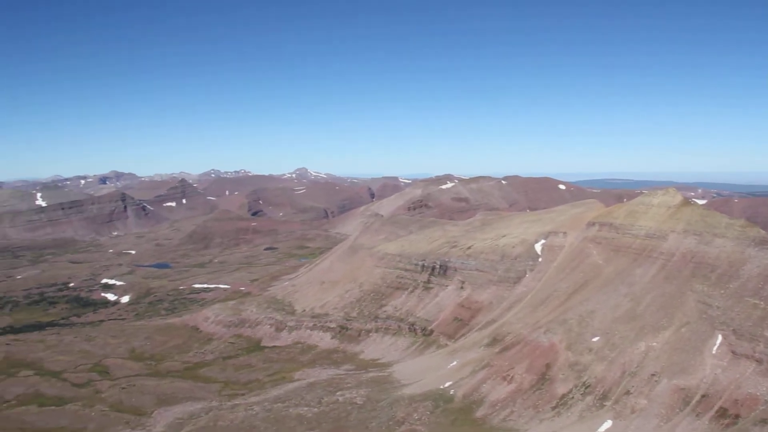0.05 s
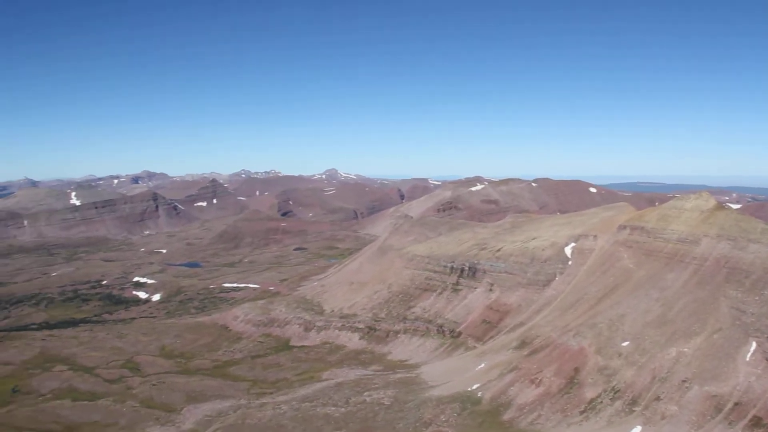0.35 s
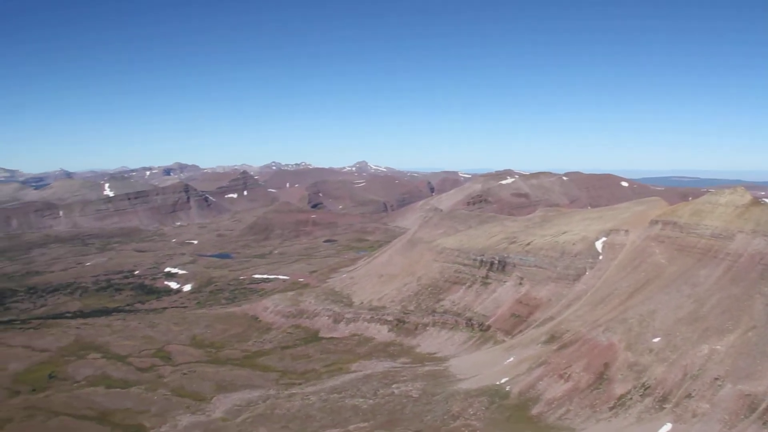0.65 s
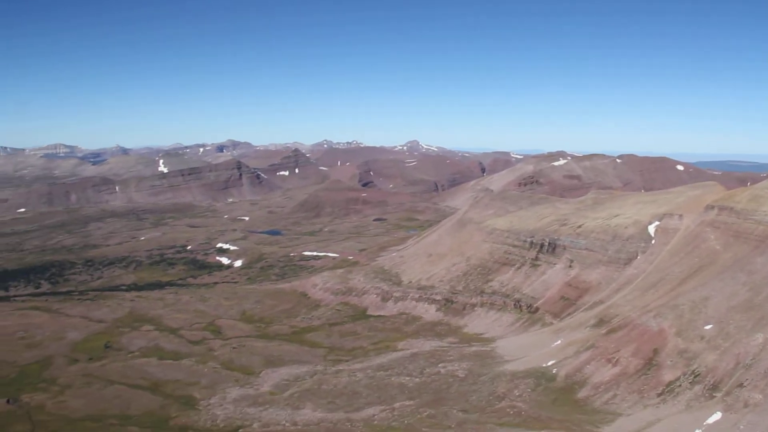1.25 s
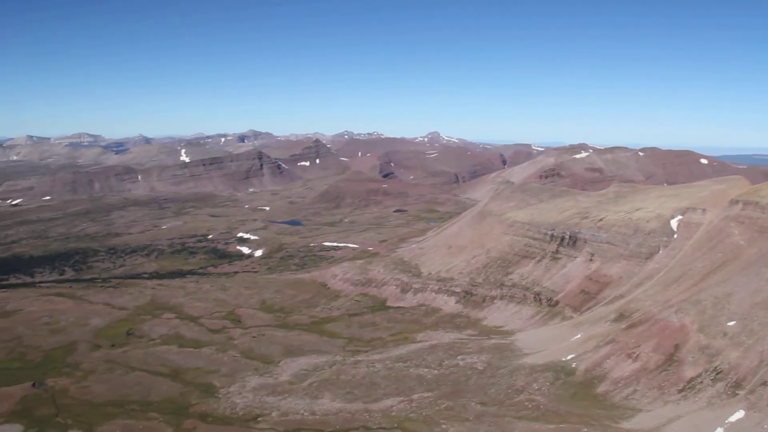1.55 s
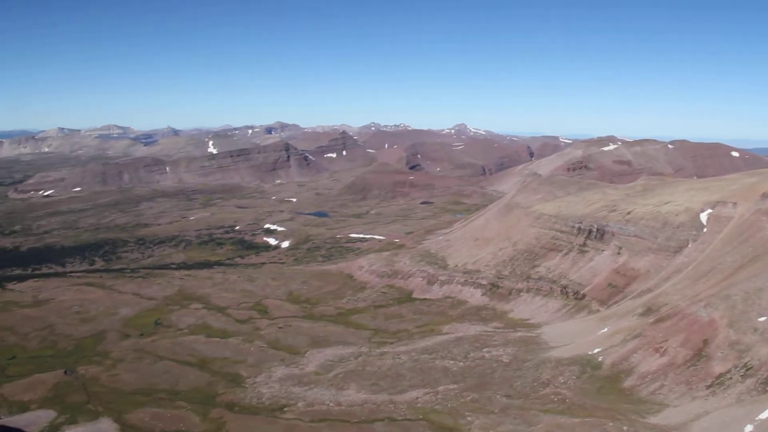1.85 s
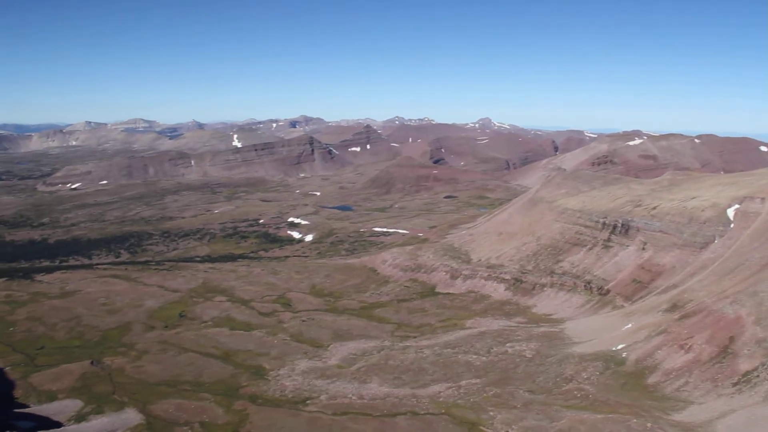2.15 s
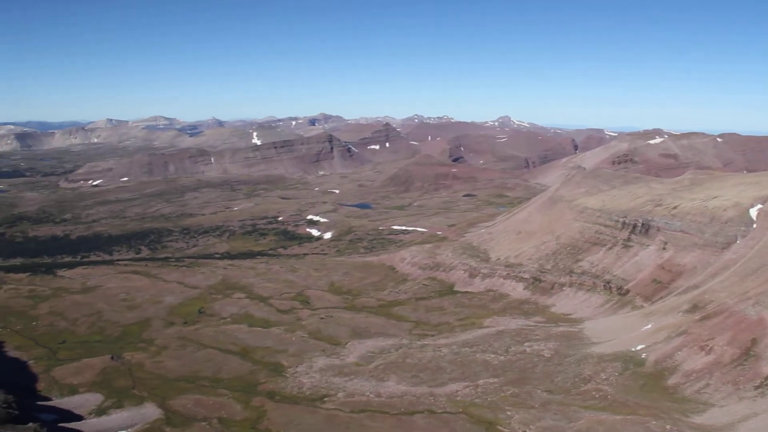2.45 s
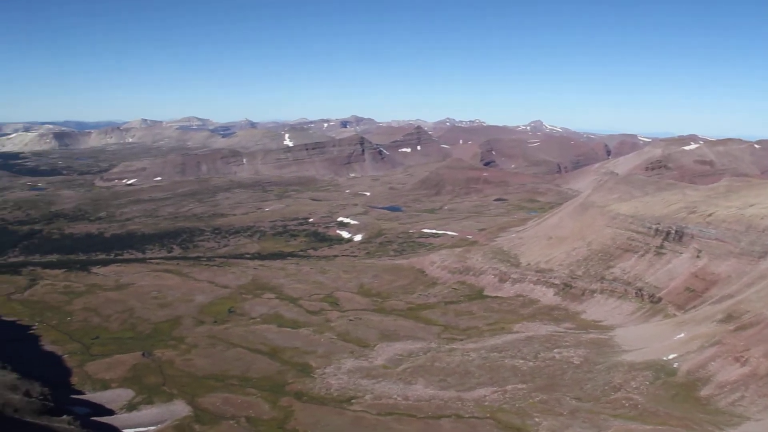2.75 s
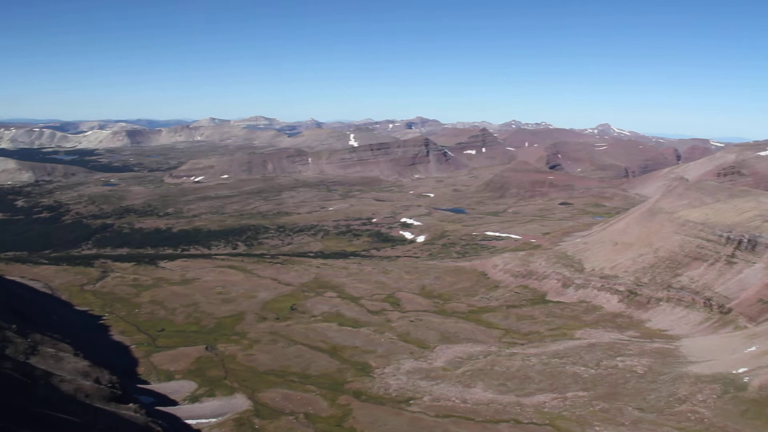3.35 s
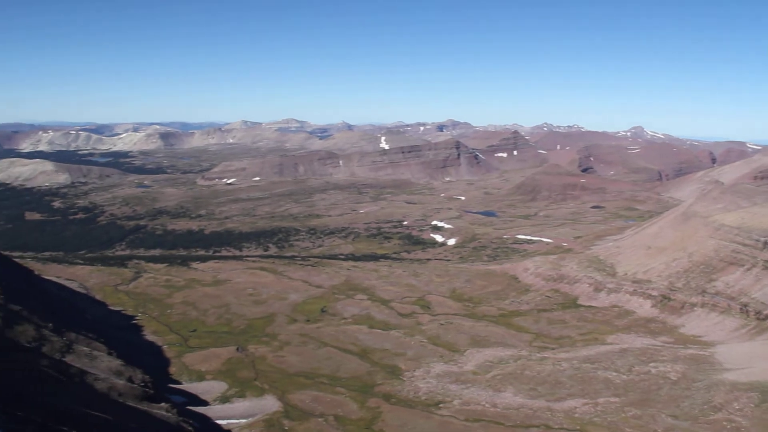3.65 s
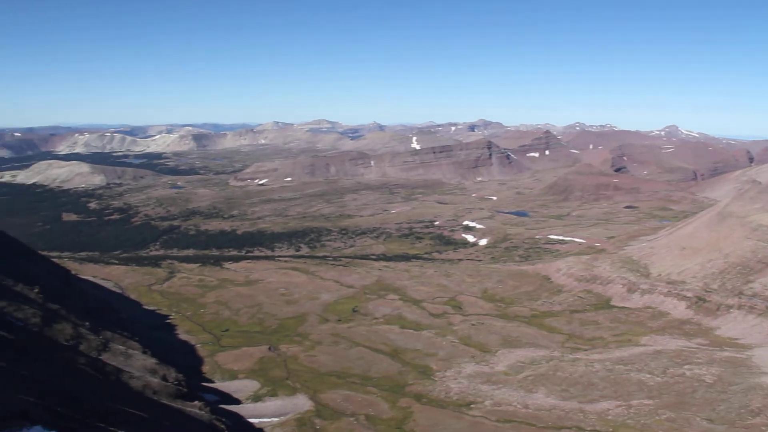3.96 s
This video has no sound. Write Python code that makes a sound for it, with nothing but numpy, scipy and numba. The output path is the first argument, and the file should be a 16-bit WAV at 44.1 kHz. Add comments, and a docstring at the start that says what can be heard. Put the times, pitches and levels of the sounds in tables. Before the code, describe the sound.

Wind rumbles against a hand-held camera's microphone on an open mountain ridge. The uneven gusts sink into brief lulls and build again, with a few small pops, faint dry ticks and a slight hiss underneath.

```python
"""Gusty wind rumbles on the bare microphone of a hand-held camera on an open mountain ridge.
Each passing eddy is a brief dip in pressure; stronger wind makes the dips deeper and quicker,
and a few big ones pop and overload. Small dry ticks sound on the camera body.
The gain control ducks after the blows, and a faint hiss creeps back in the lulls."""
import sys
import numpy as np
from scipy import signal
from scipy.fft import rfft, irfft
from scipy.io import wavfile
from scipy.ndimage import uniform_filter1d
from numba import njit

SR = 44100
rng = np.random.default_rng(int(sys.argv[2]) if len(sys.argv) > 2 else 0)


def generate_wav(signal):
    """Clip the signal to [-1, 1] and save it as 16-bit WAV at the path in sys.argv[1]."""
    frames = np.transpose(np.atleast_2d(signal))
    scaled = np.clip(frames, -1, 1) * 32767
    pcm = np.round(scaled).astype(np.int16)
    wavfile.write(sys.argv[1], SR, pcm)


N = 176400


def undb(db):
    """Amplitude ratio of a level in decibels."""
    return 10 ** (np.asarray(db) / 20)


def unit(x):
    """Normalisation to rms 1."""
    return x / np.sqrt(np.mean(x ** 2))


def smooth(x, span):
    """Triangular smoothing: two moving averages of span samples."""
    return uniform_filter1d(uniform_filter1d(x, span), span)


def wander(per_s):
    """Sample-and-hold noise, smoothed, with rms 1."""
    held = rng.standard_normal(N)[(np.arange(N) * per_s / SR).astype(int)]
    return unit(smooth(held, int(SR / per_s)))


def colour(x, response):
    """Minimum-phase filter through the points (frequency [Hz], gain [dB])."""
    hz, db = np.array(response).T
    size = 2 * N
    bin_hz = np.maximum(np.arange(N + 1) * SR / size, 1)
    gain = undb(np.interp(np.log(bin_hz), np.log(hz), db))
    cepstrum = irfft(np.log(gain))
    cepstrum[1:N] *= 2  # folding onto positive time makes the filter causal
    cepstrum[N + 1:] = 0
    return irfft(rfft(x, size) * np.exp(rfft(cepstrum)))[:N]


# Spectrum of the camera's hiss (frequency [Hz], relative level [dB])
HISS_SPECTRUM = [(100, 4), (500, 12), (900, 7), (1400, 4.5), (2000, -1), (3000, -5.5), (4700, -7),
                 (8000, -10), (13000, -12.5), (16000, -13.5)]
def hiss(level_db=-53):
    """Noise floor: stationary Gaussian noise, faint and even under the wind."""
    return unit(colour(rng.standard_normal(N), HISS_SPECTRUM)) * undb(level_db)


# Ticks on the camera body (time [s], level before filtering [dB])
TICKS = [(.026, -37), (.033, -44), (0.04, -43), (3.3234, -28), (3.3264, -33.5), (3.351, -34.5),
         (3.371, -35.5)]
# Tone colour of a tick (frequency [Hz], gain [dB])
TICK_RESPONSE = [(500, -27), (1800, 3.5), (3500, 0), (5300, -2.5), (8000, -15.5), (15000, -35.5)]
def ticks(t, decay_s=0.0024):
    """Damped transients: bright bursts of noise that decay exponentially."""
    envelope = sum(undb(db) * (t >= at) * np.exp(-np.abs(t - at) / decay_s) for at, db in TICKS)
    return colour(envelope * rng.standard_normal(N), TICK_RESPONSE)


# Big eddies that hit the port head-on (time [s], peak level [dB], frequency [Hz], half length [s])
POPS = [(0.4205, 8, 297.5, 0.0031), (2.4283, 7, 223, 0.0017), (2.5606, 13, 312, 0.0014),
        (3.2969, 10, 241, .0024), (3.8539, 6.5, 296, 0.0017)]
def pops(t):
    """Pressure pulses: a big eddy sucks hard at the diaphragm, with a push before and after."""
    return sum(-undb(db) * np.cos(2 * np.pi * hz * (t - at)) * np.exp(-((t - at) / half_s) ** 2)
               for at, db, hz, half_s in POPS)


# Strength of the wind at the microphone (time [s], level [dB])
WIND = [(0, -8), (.11, -20.5), (.19, -26), (.29, -27), (.39, -19.5), (.5, -8.5), (.59, -9), (.69, -12),
        (.75, -6), (.83, -10), (.93, -7), (.98, -16.5), (1.11, -11), (1.16, -35), (1.21, -30.5),
        (1.27, -20.5), (1.32, -26), (1.36, -17.5), (1.43, -31.5), (1.63, -25.5), (1.71, -33.5), (1.75, -21),
        (1.8, -12), (1.92, -10.5), (1.99, -15), (2.2, -6.5), (2.29, -15.5), (2.41, -10.5), (2.6, -8.5),
        (2.7, -5), (2.8, -5.5), (2.89, -18), (3.08, -20), (3.13, -31.5), (3.18, -17.5), (3.27, -15),
        (3.39, -9.5), (3.44, -17), (3.57, -7), (3.66, -22.5), (3.7, -16), (3.78, -26.5), (3.83, -11.5),
        (3.92, -16.5), (3.97, -11)]
# Short buffets on top (time [s], added level [dB], sharpness [ln of the eddies' narrowing factor])
BUFFETS = [(.047, -0.5, 0.43), (.102, 14.5, 0.38), (.113, 10, 0.3), (.148, 13.5, -0.073), (.164, 13, -0.36),
           (.321, 14.5, 0.025), (.379, 7.5, 0.44), (0.413, 12.5, 0.72), (.431, 10, 0.24), (0.499, 3, .15),
           (0.53, 2, -0.074), (.575, 5, 0.54), (.622, 7.5, -0.56), (.67, -1.5, 0.82), (.74, 3, .35),
           (.765, 4, -0.008), (.823, 8.5, -0.3), (.908, 4, 0.28), (1.122, 9.5, -0.44), (1.254, 13, -0.15),
           (1.362, 1.5, 0.69), (1.397, 10.5, 0.14), (1.654, 15.5, .35), (1.843, 1.5, 0.54), (1.88, 4, 0.29),
           (1.917, 4, 0.63), (1.953, 0.5, 0.47), (2.025, 9, -0.45), (2.074, 6, 0.36), (2.2, 5, 0.038),
           (2.548, 4, .1), (2.58, 12.5, -0.49), (2.629, 0.5, 0.54), (2.647, 4.5, .3), (2.724, 3, 0.43),
           (2.663, 1.5, 0.42), (3.257, 7, 0.5), (3.34, 3.5, 0.41), (3.361, 9.5, 0.21), (3.385, 6, 0.27),
           (3.391, 3.5, .4), (3.978, -2.5, 0.89)]
def airflow(t, flutter_db=2.32, flutter_sharpness=0.027, buffet_s=0.0045):
    """Advection: faster flow carries eddies past sooner. Gives level [dB] and eddy half width [s]."""
    flutter = wander(per_s=120)
    wind_db = np.interp(t, *np.array(WIND).T) + flutter_db * flutter
    sharpness = flutter_sharpness * flutter
    for at, added_db, buffet_sharpness in BUFFETS:
        # a buffet takes over from the flutter while it lasts
        bump = np.exp(-.5 * ((t - at) / buffet_s) ** 2)
        wind_db += bump * (added_db - flutter_db * flutter)
        sharpness += bump * (buffet_sharpness - flutter_sharpness * flutter)
    reference_db, narrowing_per_db = -9, 0.0528
    narrowing = sharpness + narrowing_per_db * (wind_db - reference_db)
    return wind_db, 0.00087 * np.exp(-narrowing)


# Frequency response of the microphone port (frequency [Hz], gain [dB])
PORT_RESPONSE = [(20, -39), (40, -22), (70, -8.5), (120, 0.5), (200, 3), (330, 3.5), (600, 0.5),
                 (1100, -0.5), (2000, -2.5), (4000, -6)]
def turbulence(t, eddies_per_s=1500, depth_spread_db=4.5, width_spread=0.16, crest=2.72):
    """Vortex suction: each eddy's core is a bell-shaped pressure dip; the port filters their sum."""
    wind_db, typical_width_s = airflow(t)
    count = eddies_per_s * N // SR
    arrivals = rng.integers(0, N, count)
    depth_draw, width_draw = rng.standard_normal((count, 2)).T
    half_width_s = typical_width_s[arrivals] * np.exp(width_spread * width_draw)
    offsets = np.arange(-512, 513)
    dips = np.hanning(len(offsets)) / (1 + (offsets / SR / half_width_s[:, None]) ** 2)
    dips *= -undb(depth_spread_db * depth_draw)[:, None]
    positions = (arrivals[:, None] + offsets) % N
    pressure = np.bincount(positions.ravel(), dips.ravel(), N)
    fluctuation = pressure - uniform_filter1d(pressure, size=2205)
    rumble = colour(fluctuation, PORT_RESPONSE)
    local_rms = np.sqrt(smooth(rumble ** 2, span=380))
    rounded = crest * np.tanh(rumble / local_rms / crest)  # soft limit at crest times the local rms
    return rounded * undb(wind_db + 1)


def scene():
    """Superposition: wind, pops, ticks and hiss add at one microphone."""
    t = np.arange(N) / SR
    return (turbulence(t) + pops(t) + ticks(t) + hiss())[None]


@njit
def duck(excess_db, attack_s, release_db_per_s):
    """Automatic gain control: the cut [dB] rises quickly towards any excess, then falls steadily."""
    cut_db, cut = np.empty(len(excess_db)), 0.
    for i in range(len(excess_db)):
        if excess_db[i] > cut:
            cut += (excess_db[i] - cut) / (attack_s * SR)
        else:
            cut = max(cut - release_db_per_s / SR, 0.)
        cut_db[i] = cut
    return cut_db


def record(dry, low_cut_hz=28, high_cut_hz=15800, threshold_db=-10.5):
    """Band limiting and overload: gain control ducks after loud blows, and what gets past it clips."""
    high_pass = signal.butter(2, low_cut_hz, "high", fs=SR, output="sos")
    low_pass = signal.ellip(8, .1, 70, high_cut_hz, fs=SR, output="sos")
    mic = signal.sosfilt(high_pass, dry)
    excess_db = 20 * np.log10(np.abs(mic[0]) + 1e-9) - threshold_db
    cut_db = duck(excess_db, attack_s=0.017, release_db_per_s=14)
    clipped = np.clip(mic * undb(-cut_db), -1, 1)
    return signal.sosfilt(low_pass, clipped)


dry = scene()
out = record(dry)
generate_wav(out)
```